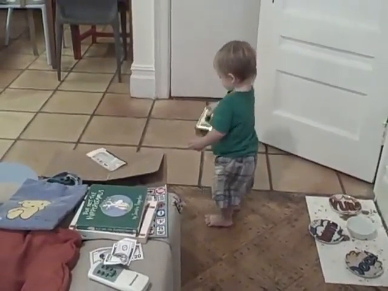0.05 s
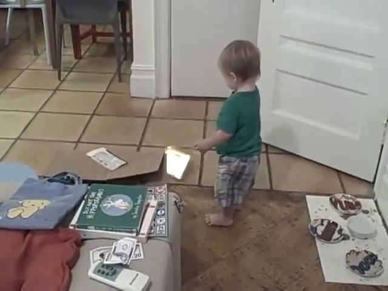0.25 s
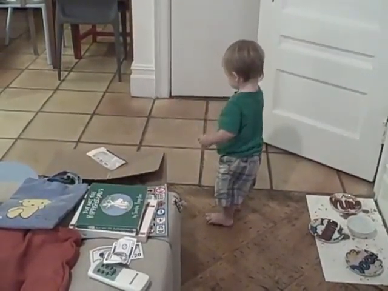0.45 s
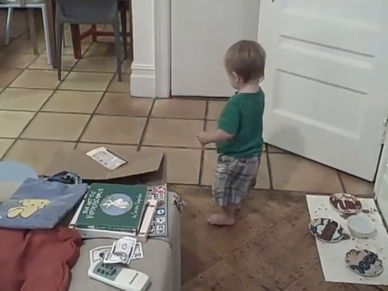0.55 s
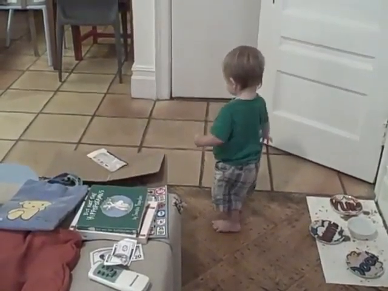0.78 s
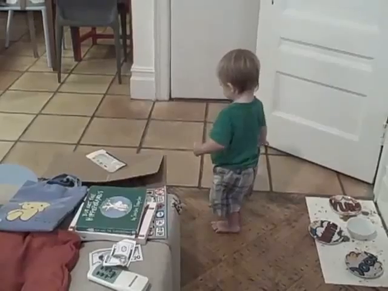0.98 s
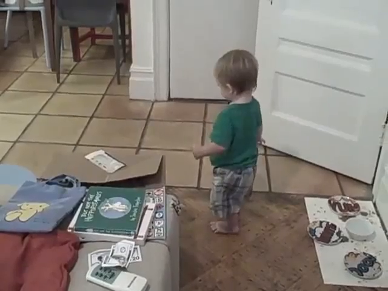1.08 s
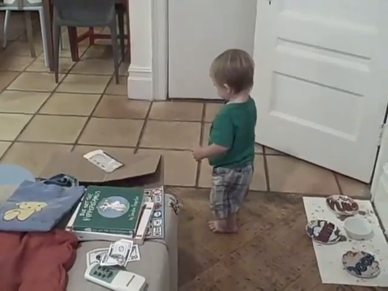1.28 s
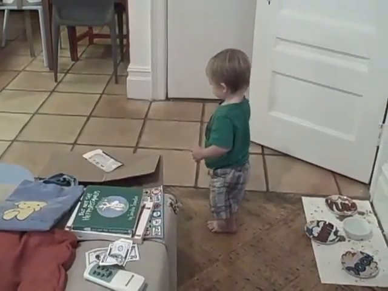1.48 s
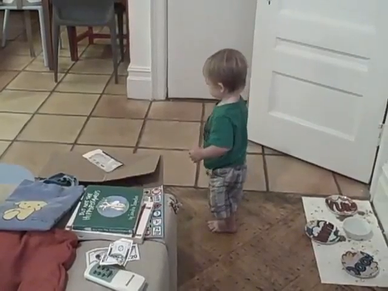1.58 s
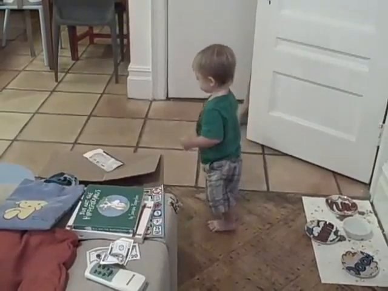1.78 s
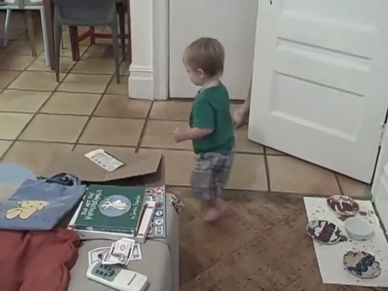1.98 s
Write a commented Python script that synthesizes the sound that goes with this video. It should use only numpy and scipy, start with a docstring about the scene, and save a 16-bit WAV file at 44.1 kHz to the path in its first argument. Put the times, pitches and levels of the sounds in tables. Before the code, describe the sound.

In an echoing room with a low hum, a thin metal lid hits the tiles, loud enough to distort the microphone slightly. It bounces with hollow, fading clangs and wobbles still. Then comes a light click, probably a door.

```python
"""A steady room hum, and almost at once a tin lid clatters onto a tiled floor in a live room.
It bounces, lands flatter and rocks to rest. Each bounce bends its flat face (a short hollow note),
rings its rim, thumps its body and sets off a clash of dense sheet modes; the rocking keeps only
the note and a soft clash. Later comes a small double click, probably from the door.
The loud blows overload the microphone."""
import sys
import numpy as np
from scipy import signal
from scipy.fft import rfft, irfft
from scipy.io import wavfile

SR = 44100
rng = np.random.default_rng(int(sys.argv[2]) if len(sys.argv) > 2 else 0)


def store_pcm(level_fs):
    """Save levels as 16-bit WAV."""
    pcm = np.round(np.clip(level_fs, -1, 1) * 32767).astype(np.int16)
    wavfile.write(sys.argv[1], SR, np.atleast_2d(pcm).T)


N = 90404

# tone of the house's steady noise: frequency_hz, relative_db
HUM_EQ = [(20, -11), (100, -8.5), (170, -6), (280, -1.5), (450, -9), (780, -8.5), (1200, -16.5),
          (1900, -20), (3000, -20.5), (4200, -27.5), (5800, -31), (7500, -43), (9400, -55.5),
          (12000, -78.5)]
# the lid's bounces: start_s, clash_db, tilt_db_per_octave, rim_db, face_db, face_pitch_hz, thump_db
BOUNCES = [(0.2303, -11, 2, -20, -7, 643, -13.5), (0.2335, -9, -6, -23, -8.5, 790, -27),
           (.2470, -12, -15, -36, -9, 685, -19.5), (0.264, -22, 6, -45, -37, 770, -33),
           (.2690, -10.5, 2.5, -24.5, -5.5, 768, -19), (.2880, -25, -1.5, -56, -4.5, 750, -46),
           (.3335, -9, 1.5, -21, -9.5, 706, -26), (.3490, -13.5, -9, -29.5, -8, 743, -39.5),
           (.3690, -29, -22, -34, -15.5, 718, -49), (.4440, -16, -4, -31, -14, 850, -33.5),
           (.5270, -17, 1, -25, -10, 756, -50), (.5545, -24, 3, -32.5, -9.5, 736, -52.5),
           (.5730, -19.5, -4, -34.5, -23, 730, -55), (.5960, -24, -3.5, -50.5, -12.5, 737, -50),
           (.6160, -50, -6, -45, -17, 745, -52.5), (.6335, -23, -2.5, -26.5, -35.5, 750, -50),
           (.6380, -19, -2, -30, -6.5, 759, -44), (.6600, -24, -7, -29.5, -20, 739, -44.5),
           (.6810, -29.5, -3.5, -50, -19.5, 769, -47), (.7000, -38, -1.5, -43.5, -21.5, 748, -60),
           (.7290, -30.5, -3, -41, -17.5, 748, -57), (.7560, -30.5, -6.5, -45.5, -38, 770, -61),
           (.7880, -44, 0.5, -47, -26, 766, -55)]
# the rim's modes, three matching lists: pitch_hz; level_db; t60_s
RIM_PITCHES = [369, 575, 612, 668, 884, 1030, 1227, 1416, 1497, 1652, 1750, 2058, 2240, 3520, 3910]
RIM_LEVELS = [3.5, -3.5, -11.5, -2, -4, -9.5, -1, -6.5, -3.5, -4.5, -5.5, -5, -6, -8.5, -21.5]
RIM_DECAYS = [0.25, .28, 0.32, 0.53, 0.24, .3, 0.31, 0.55, 0.28, 0.29, .42, 0.33, 0.44, 0.16, 0.23]
# low modes of the whole lid: pitch_hz, level_db, t60_s
THUMP_MODES = [(151.4, 2.5, 0.17), (252.3, -5.5, 0.46)]
# tone of the clash: frequency_hz, relative_db
CLASH_EQ = [(30, -30), (95, -25), (140, -5), (210, -13), (350, 3.5), (480, -0.5), (720, 3.5), (1000, -2.5),
            (1500, 1.5), (2100, -3), (2450, -5), (3000, -5.5), (4600, -9), (5500, -14), (7000, -20),
            (8500, -32), (9600, -46.5), (12000, -66)]
# decay of the noisy crash within the clash: frequency_hz, t60_s
CRASH_DECAYS = [(150, 0.22), (800, 0.13), (2000, 0.25), (5000, 0.12), (9000, 0.18)]
# the room's reverb time: frequency_hz, t60_s
ROOM_DECAYS = [(100, 0.17), (400, 0.71), (1500, 0.73), (4000, 0.31), (9000, 0.62)]
# the lid's last rocking on its rim: start_s, level_db
ROCKS = [(.863, -35.5), (.884, -31.5), (.910, -32.5), (.933, -31.5), (.962, -35), (.986, -37),
         (1.017, -38.5), (1.144, -35)]
# the two halves of the door click: start_s, level_db
CLICKS = [(1.858, -29.5), (1.8626, -35)]
# tone of each click: frequency_hz, relative_db
CLICK_EQ = [(200, -23), (1200, -1), (2200, -2), (3000, 8), (3600, -11), (6500, -11), (9500, -33),
            (12000, -60)]

HUM_DB = -41.5
MODE_ATTACK_S = 0.002  # rim and thump
FACE_ATTACK_S, FACE_HOLD_S, FACE_T60_S = 0.00067, 0.011, 0.049
SHEET_MODE_COUNT, SHEET_LO_HZ, SHEET_HI_HZ = 260, 1112, 9125
SHEET_DB, SHEET_T60_S = -15, 0.33
CRACK_DB, CRACK_T60_S, CRACK_LO_HZ = 4, 0.056, 2500
CLASH_ATTACK_S = 0.00098  # the bending wave spreads over the sheet
PREDELAY_S, CLASH_WET_DB, RING_WET_DB = 0.008, -4, -12
ROCK_HZ, ROCK_CLASH_DB, ROCK_TILT_DB_PER_OCTAVE = 762.5, -14, -4.5
CLICK_T60_S, CLICK_WET_DB = 0.0083, -3.5
CLICK_RING_HZ, CLICK_RING_DB, CLICK_RING_T60_S = 2950, -21, 0.1
OVERLOAD_CEILING, OVERLOAD_KNEE, HIGH_CUT_HZ = 1.0, 6, 9600
T = np.arange(SR) / SR  # every hit is built on this one-second timeline


def amp(db):
    return 10 ** (np.asarray(db) / 20)


def along(curve, hz):
    """Read a curve of (frequency, value) points on a log frequency axis."""
    frequencies, values = np.transpose(curve)
    return np.interp(np.log(hz + 1), np.log(frequencies + 1), values)


def add(track, start_s, sound):
    """Mix a sound into a track."""
    part = track[round(start_s * SR):][:len(sound)]
    part += sound[:len(part)]


def attack(rise_s):
    """Envelope that rises smoothly to full level."""
    return 1 - np.exp(-T / rise_s)


def decay(t60_s, t=T):
    """Envelope that falls 60 dB in t60_s."""
    return np.exp(-np.log(1000) * t / t60_s)


def sine(hz):
    """One second of a sine at a random phase."""
    return np.sin(2 * np.pi * (hz * T + rng.random()))


def fading_noise(decays):
    """One second of white noise; each band dies at its own speed."""
    hz, t, bands = signal.stft(rng.standard_normal(SR), SR, nperseg=256)
    faded = bands * decay(along(decays, hz)[:, None], t)
    return signal.istft(faded, SR, nperseg=256)[1][:SR]


def equalise(sound, curve_db):
    """Minimum-phase EQ, scaled to keep the power of white noise."""
    hz = np.fft.rfftfreq(4096, 1 / SR)
    cepstrum = irfft(np.log(amp(curve_db(hz))))
    half = len(cepstrum) // 2
    cepstrum[1:half] *= 2  # folded forward, so nothing rings ahead of a hit
    cepstrum[half + 1:] = 0
    kernel = irfft(np.exp(rfft(cepstrum)))
    return signal.fftconvolve(sound, kernel / np.linalg.norm(kernel))[:len(sound)]


def room_hum():
    """The bed: steady, dark background noise of the house."""
    noise = rng.standard_normal(N + SR)
    return amp(HUM_DB) * equalise(noise, lambda hz: along(HUM_EQ, hz))[SR:]


def rim(scatter_db=2.0):
    """The rim's modes ring in a slightly new mix at each bounce."""
    modes = sum(amp(db + scatter_db * rng.normal()) * sine(hz) * decay(t60_s)
                for hz, db, t60_s in zip(RIM_PITCHES, RIM_LEVELS, RIM_DECAYS))
    return modes * attack(MODE_ATTACK_S)


def face(pitch_hz):
    """A hollow note: the flat face flexes for a moment before the floor damps it."""
    release = decay(FACE_T60_S, np.maximum(T - FACE_HOLD_S, 0))
    return sine(pitch_hz) * attack(FACE_ATTACK_S) * release


def thump():
    """The low end: the two lowest modes, set off as the whole lid lands."""
    modes = sum(amp(db) * np.cos(2 * np.pi * hz * T) * decay(t60_s) for hz, db, t60_s in THUMP_MODES)
    return modes * attack(MODE_ATTACK_S)


def clash(sheet_hz, tilt_db_per_octave):
    """The hard edge cracks on the tile and the thin sheet crashes, leaving dense high modes ringing."""
    spectrum = np.zeros(SR // 2 + 1, complex)  # one bin per hertz
    spectrum[sheet_hz] = np.exp(2j * np.pi * rng.random(len(sheet_hz)))
    modes = irfft(spectrum, SR)
    shimmer = amp(SHEET_DB) * modes / np.std(modes) * decay(SHEET_T60_S)
    burst = amp(CRACK_DB) * rng.standard_normal(SR) * decay(CRACK_T60_S)
    crack = signal.sosfilt(signal.butter(2, CRACK_LO_HZ, "high", fs=SR, output="sos"), burst)
    crash = fading_noise(CRASH_DECAYS)

    def tone_db(hz):
        treble_octaves = np.log2(np.maximum(hz / SHEET_LO_HZ, 1))
        return along(CLASH_EQ, hz) + tilt_db_per_octave * treble_octaves

    return equalise(attack(CLASH_ATTACK_S) * (crash + shimmer + crack), tone_db)


def in_room(sound, wet_db):
    """The live room answers a sound with a diffuse tail."""
    tail = fading_noise(ROOM_DECAYS)
    reverb = signal.fftconvolve(sound, tail / np.linalg.norm(tail))
    out = sound.copy()
    add(out, PREDELAY_S, amp(wet_db) * reverb)
    return out


def lid():
    """Bounces, then soft rocking; every contact sounds the same piece of tin."""
    out = np.zeros(N)
    spread = (np.arange(SHEET_MODE_COUNT) + rng.random(SHEET_MODE_COUNT)) / SHEET_MODE_COUNT
    sheet_hz = (SHEET_LO_HZ + spread * (SHEET_HI_HZ - SHEET_LO_HZ)).astype(int)
    for start_s, clash_db, tilt, rim_db, face_db, face_hz, thump_db in BOUNCES:
        ring = amp(rim_db) * rim() + amp(face_db) * face(face_hz) + amp(thump_db) * thump()
        impact = amp(clash_db) * clash(sheet_hz, tilt)
        add(out, start_s, in_room(impact, CLASH_WET_DB) + in_room(ring, RING_WET_DB))
    for start_s, level_db in ROCKS:
        tap = face(ROCK_HZ) + amp(ROCK_CLASH_DB) * clash(sheet_hz, ROCK_TILT_DB_PER_OCTAVE)
        add(out, start_s, amp(level_db) * in_room(tap, RING_WET_DB))
    return out


def door_click():
    """A light double click with a brief metallic ring."""
    out = np.zeros(N)
    for start_s, level_db in CLICKS:
        burst = rng.standard_normal(SR) * decay(CLICK_T60_S)
        tick = equalise(burst, lambda hz: along(CLICK_EQ, hz))
        ring = amp(CLICK_RING_DB) * sine(CLICK_RING_HZ) * decay(CLICK_RING_T60_S)
        add(out, start_s, amp(level_db) * in_room(tick + ring, CLICK_WET_DB))
    return out


def scene():
    """Mono mix: lid and click over the bed of hum."""
    return (lid() + door_click() + room_hum())[None]


def record(dry):
    """The microphone soft-clips the loudest peaks and steeply cuts the top end."""
    squash = (1 + np.abs(dry / OVERLOAD_CEILING) ** OVERLOAD_KNEE) ** (1 / OVERLOAD_KNEE)
    high_cut = signal.butter(20, HIGH_CUT_HZ, fs=SR, output="sos")
    return signal.sosfilt(high_cut, dry / squash)


dry = scene()
out = record(dry)
store_pcm(out)
```